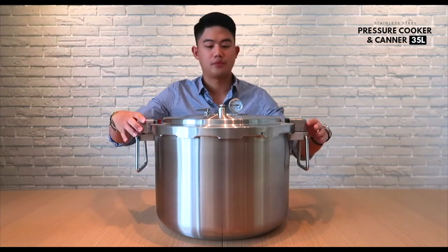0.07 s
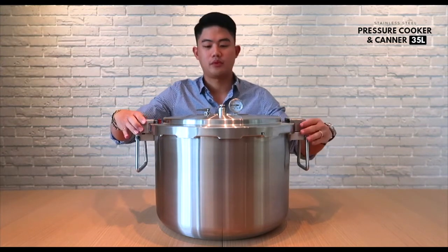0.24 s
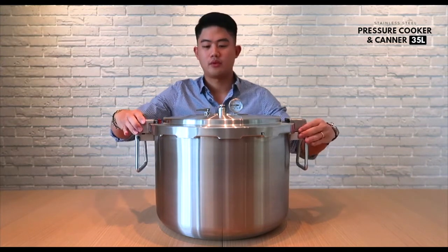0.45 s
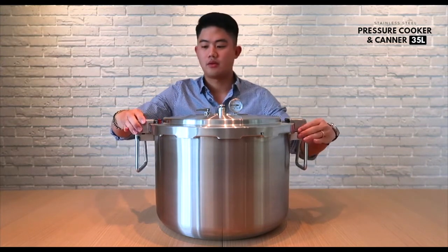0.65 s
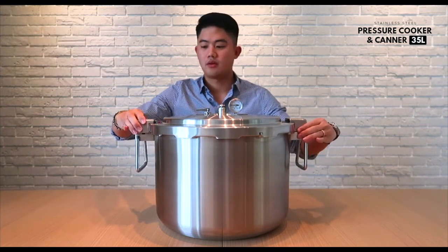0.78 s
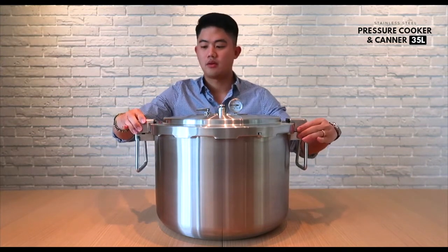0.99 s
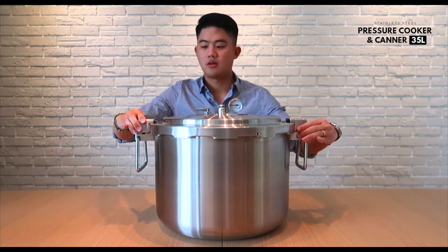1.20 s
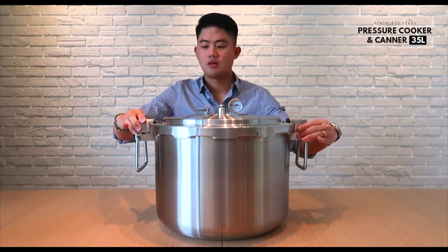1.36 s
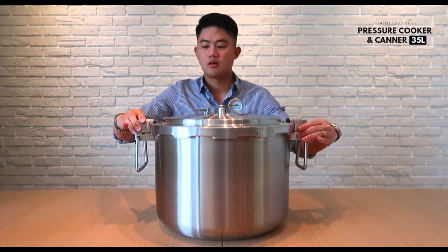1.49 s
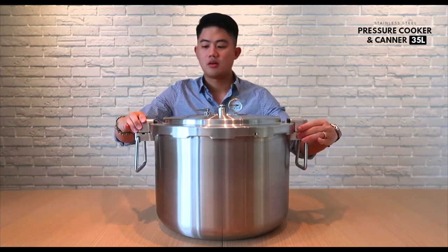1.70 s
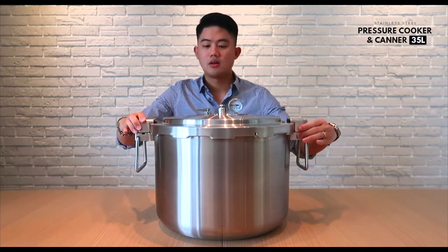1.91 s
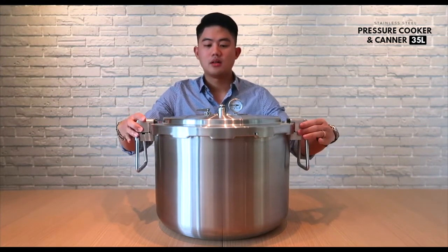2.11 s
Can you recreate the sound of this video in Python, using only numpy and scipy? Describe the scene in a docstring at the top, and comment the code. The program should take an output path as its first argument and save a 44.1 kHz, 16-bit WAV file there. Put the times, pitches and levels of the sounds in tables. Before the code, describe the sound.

A big stainless-steel pot lid is twisted, scraping and clanking in bursts in a quiet room

```python
"""The lid of a big stainless-steel pressure cooker is twisted by its handles, over quiet room noise.
Lugs grind over the rim in short runs of tiny slips, which ring a crowd of shell modes and some clear ones.
Lugs and handles knock in between, each knock a damped resonance with early reflections.
The lid seats at about 1.2 s and the ring is choked; from 1.6 s it is turned again, locked.
Squeals are wavering sines, one per mode that stick-slip locks on to, loudest in the last hard turn."""
import sys
import numpy as np
from scipy import signal
from scipy.fft import rfft, irfft, next_fast_len
from scipy.io import wavfile

SR = 44100
rng = np.random.default_rng(int(sys.argv[2]) if len(sys.argv) > 2 else 0)


def log_audio(samples):
    """Write samples as a 16-bit WAV file to the path given in sys.argv[1]."""
    # one column per channel
    frames = np.atleast_2d(samples).T
    # limit to full scale, then quantise
    limited = np.clip(frames, -1, 1)
    pcm = np.round(limited * 32767).astype(np.int16)
    wavfile.write(sys.argv[1], SR, pcm)


N = 94770
T = np.arange(N) / SR
SIZE = next_fast_len(2 * N)
HZ = np.maximum(np.arange(SIZE // 2 + 1) * SR / SIZE, 1)
SEATED_S, LOCKED_S = 1.183, 1.6

# Lugs grinding on the rim; the faintest rows are the lid shifting under the hands.
# Each row: start, rise, hold and release in seconds, level in dB, then bass, low-mid, presence,
# treble and top in dB re the middle range, damping by the grip in dB/s (below 0 counts as 0).
SCRAPE_TABLE = [ (0.197, .004, .004, .03, -47.5, 25, 10.5, -24, -24, -19, 82.5),
                (0.227, .004, .004, 0.012, -73, 49, 22, -13, -27, 6, 77.5),
                (0.334, 0.011, 0.008, 0.03, -37.5, 13, 16, -11, -29, -40, 55),
                (0.389, .012, .070, 0.13, -47, 29, 21, -15, -56, -62, 45),
                (0.492, 0.014, 0.0035, 0.018, -17, -15, -7, -6.5, -28, -20, 40),
                (0.514, 0.011, 0.016, 0.022, -9, -10, -6, 3.5, -0.5, -12, 21),
                (0.537, .015, .035, 0.077, -37.5, 25, -16, -7, -13, -28, 30),
                (0.692, 0.0058, .014, 0.022, -32.5, -16, 0, -10, -24, -37, 46.5),
                (0.739, 0.022, 0.044, 0.047, -33, 13.5, 2, 3, -13, -39, 36.5),
                (0.823, 0.019, 0.011, 0.1, -15, -8.5, -7.5, -4, 0.5, 1.5, 39.5),
                (0.877, 0.003, 0.018, 0.15, -22, -1, -5, 0, 2, -1, 48),
                (0.948, 0.0097, .045, 0.024, -31, 6, 0.5, -9.5, 1, -7, 55.5),
                (1.038, .020, 0.019, 0.044, -40, 10.5, -5, -2, 1, -9, 23),
                (1.105, 0.001, 0.0078, 0.016, -27, 5, 32.5, 26, 15, 4, 79),
                (1.115, 0.0033, 0.0087, 0.046, -13.5, 3.5, 3.5, 3.5, -13.5, -16, 41),
                (1.141, 0.011, 0.0087, 0.052, -24.5, 19, 18, 20, -7, -31, 58),
                (1.235, .003, .026, 0.033, -24.5, -2.5, 14, -7.5, -34, -53, 101.5),
                (1.531, .015, .028, 0.069, -51, 6, 6, -3, -9.5, -20, 81.5),
                (1.563, .020, .045, 0.035, -57, 4, 18.5, -14, -21, -44, 71),
                (1.631, 0.0025, .005, .01, -35.5, -12.5, -6.5, 4, 1, -16, 40),
                (1.647, 0.0027, 0.026, 0.027, -12, -11.5, -14, 0, -2, 3, 4),
                (1.661, 0.0025, 0.011, 0.036, -9, -5, 2, 7, 1.5, 0, -4),
                (1.68, 0.0093, 0.0053, 0.15, -9.5, 1, 11, 6.5, 2, 3, 25.5),
                (1.804, 0.043, 0.055, 0.27, -28, -16, 13.5, 7, 1, -9, 23),
                (1.968, 0.048, 0.016, 0.088, -20.5, -6.5, 3, -6.5, -19.5, -59, 85),
                (2.017, 0.0035, 0.0047, 0.016, -43, 15, -5, -4, -20, -38, 81)]
# Spectrum of the crowd of shell modes. Each row: frequency in Hz, relative density in dB per Hz.
SHELL_SPECTRUM = [(25, -33), (48, -16.5), (100, -8.5), (160, -7.5), (230, 0.5), (600, 0), (1130, -1),
                  (1450, 0.5), (2000, -1.5), (2900, 0), (3250, -6.5), (5000, -7), (9700, -4.5),
                  (11300, -15), (15500, -22.5)]


def from_db(db):
    """Decibels to gain."""
    return 10 ** (np.asarray(db) / 20)


def unit(x):
    """Scale to an energy (sum of squares) of one."""
    return x / np.sqrt(np.sum(x ** 2) + 1e-20)


def at_hz(points, hz):
    """Read a (Hz, value) table on a log-frequency axis."""
    table_hz, values = np.transpose(points)
    return np.interp(np.log(hz), np.log(table_hz), values)


def dying(t60_s, t=T):
    """Gain that falls 60 dB in t60_s."""
    return np.exp(-np.log(1000) * np.maximum(t, 0) / max(t60_s, 1e-3))


def waver(count):
    """Slow chance: count normal draws over the scene, joined by straight lines."""
    return np.interp(T, np.linspace(0, T[-1], count), rng.standard_normal(count))


def coloured(x, points):
    """Give x a smooth spectrum with a causal (minimum-phase) filter made by folding the cepstrum."""
    cepstrum = irfft(np.log(from_db(at_hz(points, HZ))), SIZE)
    cepstrum[1:SIZE // 2] *= 2
    cepstrum[SIZE // 2 + 1:] = 0
    response = np.exp(rfft(cepstrum))
    return irfft(rfft(x, SIZE) * response, SIZE)[:N]


def through(x, response):
    """Play x through an impulse response."""
    return signal.fftconvolve(x, response)[:N]


def room_noise():
    """Dull background: coloured noise whose level wavers a little."""
    # Each row: frequency in Hz, relative density in dB per Hz.
    air = [(25, -34.5), (60, -20), (130, -12), (250, -4.5), (580, -6.5), (750, -10.5), (1200, -24),
           (1600, -21), (3000, -27), (9700, -33), (12000, -51.5), (16000, -49)]
    rms_db, waver_db = -58.5, .5
    level = from_db(rms_db + waver_db * waver(count=60))
    return level * np.sqrt(N) * unit(coloured(rng.standard_normal(N), air))


def shell_ring():
    """Impulse response of closely spaced steel modes, the highest dying soonest."""
    # Each row: frequency in Hz, 60 dB decay time in seconds.
    shell_t60 = [(60, 0.53), (250, 2.16), (1000, 1.31), (2700, 0.83), (4000, 0.76), (8000, 0.47),
                 (10000, 0.35), (12000, .42), (16000, .33)]
    spacing_hz, top_hz = 7, 17000
    count = int(top_hz / spacing_hz)
    draws = rng.random((count, 2))
    mode_hz = (np.arange(count) + 1 + draws[:, 0]) * spacing_hz
    lines = np.zeros(len(HZ), complex)
    lines[(mode_hz * SIZE / SR).astype(int)] = np.exp(2j * np.pi * draws[:, 1])
    lines *= from_db(at_hz(SHELL_SPECTRUM, HZ))
    ring = np.zeros(N)
    edges_hz = np.r_[0, np.geomspace(150, 6000, 10), np.linspace(7000, 18000, 9)]
    for low_hz, high_hz in zip(edges_hz, edges_hz[1:]):
        band = irfft(lines * (HZ >= low_hz) * (HZ < high_hz), SIZE)[:N]
        ring += band * dying(at_hz(shell_t60, (low_hz + high_hz) / 2))
    return unit(ring)


def choke(start_s):
    """Gain left, once the lid has seated, to a sound begun at start_s before the locked turn."""
    choke_db_per_s = 91.5
    return from_db(-choke_db_per_s * np.maximum(T - SEATED_S, 0) * (start_s < LOCKED_S))


def pressure(start_s, rise_s, hold_s, release_s):
    """Force envelope: linear rise, hold, then an exponential release of 30 dB in release_s."""
    rise = np.clip((T - start_s) / max(rise_s, 1e-4), 0, 1)
    return rise * dying(2 * release_s, T - start_s - rise_s - hold_s)


def contact_colour(bass_db, low_mid_db, presence_db, treble_db, top_db):
    """Spectrum of one contact, relative to its middle range."""
    # Corner frequencies in Hz: deep bass, bass, low-mid, middle, presence, treble, top.
    colour_hz = (45, 190, 600, 1900, 4500, 8500, 13500)
    return list(zip(colour_hz, (0, bass_db, low_mid_db, 0, presence_db, treble_db, top_db)))


def scrapes(ring):
    """Each scrape is a juddering run of uneven slips; every slip gives a short clank and feeds the ring."""
    slips_per_s, slip_spread_db, judder_db, clank_t60_s = 3800, 4, 2.5, .05
    spread = slip_spread_db * np.minimum(rng.exponential(1, N), 4)
    sizes = from_db(spread + judder_db * waver(count=300)) * rng.choice([-1, 1], N)
    slips = sizes * (rng.random(N) < slips_per_s / SR)
    out = np.zeros(N)
    for start_s, rise_s, hold_s, release_s, level_db, *colour, damping_db_per_s in SCRAPE_TABLE:
        force = pressure(start_s, rise_s, hold_s, release_s)
        clank = unit(coloured(rng.standard_normal(N) * dying(clank_t60_s), SHELL_SPECTRUM))
        gripped_ring = ring * from_db(-max(damping_db_per_s, 0) * T)
        rung = through(slips * force, clank + gripped_ring)
        sound = unit(coloured(rung, contact_colour(*colour)))
        out += from_db(level_db) * np.sqrt(np.sum(force ** 2)) * sound * choke(start_s)
    return out


def clear_modes():
    """Each clear mode stores scraping energy and lets it die; dull contacts hardly reach the high ones."""
    # Modes that stand out; the lugs press elsewhere once the lid is locked.
    # Each row: frequency in Hz, level in dB while loose, level in dB when locked, decay t60 in seconds.
    modes = [(123.5, -37, -22.5, 2.2), (230, -28, -12, 0.38), (380, -26, -38, 1.1),
             (572.3, -28.5, -22, 0.58), (752, -18.5, -19.5, 0.43), (960, -29.5, -39, 0.64),
             (1270, -30.5, -22, 0.32), (1418, -31.5, -17.5, 1.6), (1500, -20.5, -19.5, 0.47),
             (1858, -28.5, -28, 1.6), (1837, -17.5, -24, .9), (2088, -30, -17, 1.6),
             (2313, -24.5, -19.5, 1.8), (2434, -39.5, -31.5, .9), (2746, -38.5, -22, 1.2),
             (2935, -26, -24, 1.3), (4110, -24.5, -22.5, .4), (5300, -39.5, -27, 0.55),
             (7350, -22.5, -21, 0.4)]
    waver_rad, waver_db = 0.34, 3
    powers = np.array([(from_db(row[4]) * pressure(*row[:4])) ** 2 for row in SCRAPE_TABLE])
    out = np.zeros(N)
    for hz, loose_db, locked_db, t60_s in modes:
        reach_db = [min(at_hz(contact_colour(*row[5:10]), hz), 0) for row in SCRAPE_TABLE]
        power = from_db(reach_db) ** 2 @ powers
        keep = dying(t60_s, 1 / SR) ** 2  # energy left after one sample
        drives = [power * (T < LOCKED_S), power * (T >= LOCKED_S)]
        loose, locked = signal.lfilter([1 - keep], [1, -keep], drives)
        energy = loose * (from_db(loose_db) * choke(0)) ** 2 + locked * from_db(locked_db) ** 2
        beating = from_db(waver_db * waver(count=50))
        phase = 2 * np.pi * (hz * T + rng.random()) + waver_rad * waver(count=50)
        out += np.sqrt(2 * energy) * beating * np.sin(phase)
    return out


def knocks(ring):
    """A knock rings one damped resonance, then early reflections and a little of the pot's ring."""
    # Lugs and handles knocking. Each row: start in seconds, level in dB (the envelope peaks at
    # twice that gain), frequency in Hz, width in Hz.
    knock_table = [(0.339, -43.5, 3790, 149.5), (.346, -30, 1707, 220), (.349, -32, 2720, 400),
                   (0.348, -56, 4420, 50.7), (0.379, -42, 1590, 69), (0.425, -31.5, 2704, 230),
                   (0.488, -34, 3650, 400), (0.489, -27.5, 2660, 350), (0.49, -36, 1590, 200),
                   (0.491, -43, 5050, 300), (0.498, -54, 8300, 198.8), (0.505, -15.5, 1450, 350),
                   (0.52, -13.5, 2880, 400), (.526, -18, 545, 70), (.528, -10.5, 1444, 170),
                   (0.788, -11, 2670, 566), (.7875, -16.5, 2155, 300), (0.7868, -22, 4700, 1000),
                   (.787, -22.5, 9200, 2536), (0.789, -38, 13800, 2483), (0.7864, -29, 650, 620),
                   (1.239, -32.5, 950, 130.5), (1.545, -64.5, 2810, 120.7), (2.027, -25.5, 2760, 170),
                   (2.029, -34, 3650, 150), (2.028, -35.5, 8200, 200)]
    echo_db, echo_t60_s, echo_onset_t60_s, ring_db = -1, .14, 0.0067, -10
    out = np.zeros(N)
    for start_s, level_db, hz, width_hz in knock_table:
        t = np.maximum(T - start_s, 0)
        swell = np.pi * width_hz * t
        tone = from_db(level_db) * 2 * swell * np.exp(1 - swell) * np.sin(2 * np.pi * hz * t)
        reflections = rng.standard_normal(N) * dying(echo_t60_s) * (1 - dying(echo_onset_t60_s))
        echo = from_db(echo_db) * unit(through(tone, reflections))
        pot = from_db(ring_db) * unit(through(tone, ring)) * choke(start_s)
        out += tone + np.sqrt(np.sum(tone ** 2)) * (echo + pot)
    return out


def squeals():
    """A mode swells while the steel sticks and slips on it, then rings out."""
    # Each row: start, swell and hold in seconds, frequency in Hz, level in dB (RMS of the held
    # tone), decay t60 in seconds.
    squeal_table = [(1.108, 0.012, 0.11, 1819, -35, 0.87), (1.115, .020, 0.054, 1900, -34, 0.56),
                    (1.682, 0.0071, 0.014, 12674, -30, .12), (1.685, 0.013, 0.053, 7278, -19.5, .2),
                    (1.730, 0.008, 0.008, 2090, -17, 0.15), (1.690, 0.018, 0.0081, 1930, -17.5, 0.098),
                    (1.989, 0.028, 0.024, 2745, -30.5, 0.16), (2.02, 0.014, 0.027, 3660, -38, 0.075),
                    (2.091, .010, 0.0092, 3580, -38, .1)]
    waver_rad = .3
    out = np.zeros(N)
    for start_s, swell_s, hold_s, hz, level_db, t60_s in squeal_table:
        envelope = pressure(start_s, swell_s, hold_s, t60_s / 2) * choke(start_s)
        tone = np.sin(2 * np.pi * hz * T + waver_rad * waver(count=200))
        out += from_db(level_db) * np.sqrt(2) * envelope * tone
    return out


def scene():
    """Pot and room, in one channel."""
    ring = from_db(0) * shell_ring()
    return (room_noise() + scrapes(ring) + clear_modes() + knocks(ring) + squeals())[None]


def record(dry):
    """The deepest bass is cut, the highest peaks are rounded and the top is cut."""
    low_cut_hz, cutoff_hz = 38, 16100
    dry = signal.sosfilt(signal.butter(4, low_cut_hz, "high", fs=SR, output="sos"), dry)
    rounded = dry / (1 + dry ** 6) ** (1 / 6)
    return signal.sosfilt(signal.ellip(10, .1, 90, cutoff_hz, fs=SR, output="sos"), rounded)


dry = scene()
out = record(dry)
log_audio(out)
```